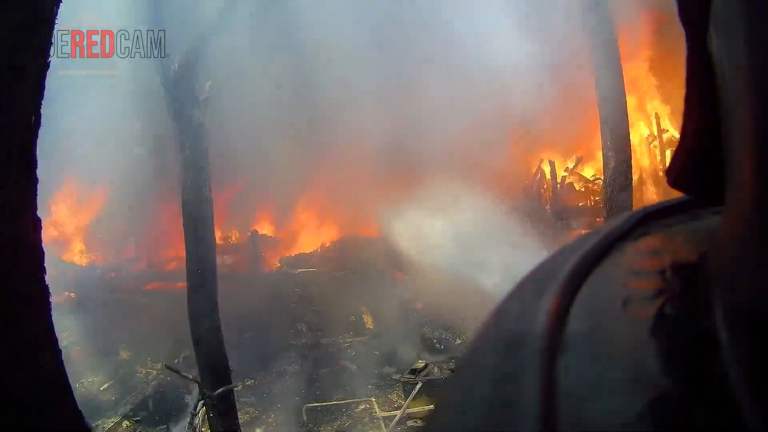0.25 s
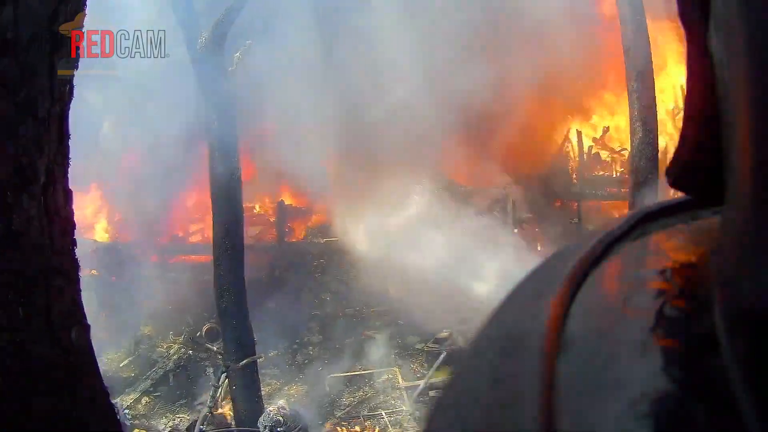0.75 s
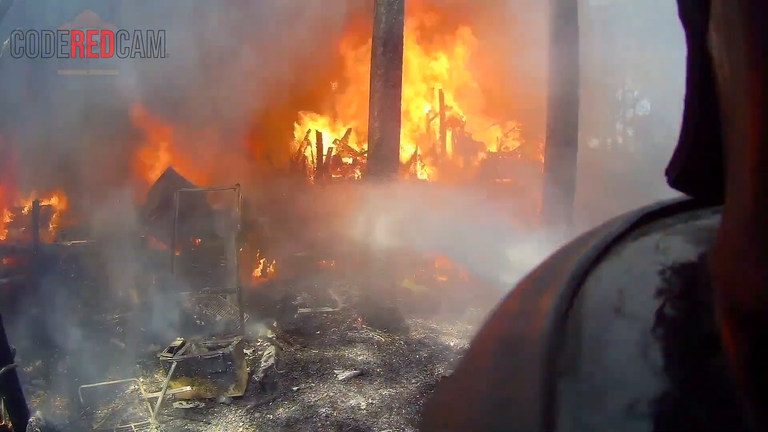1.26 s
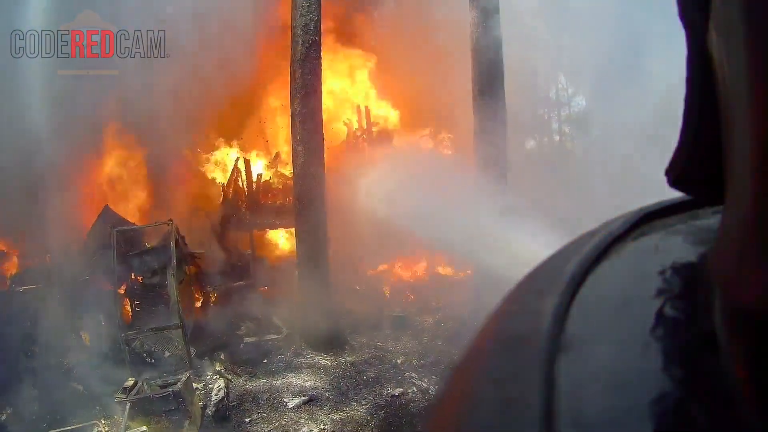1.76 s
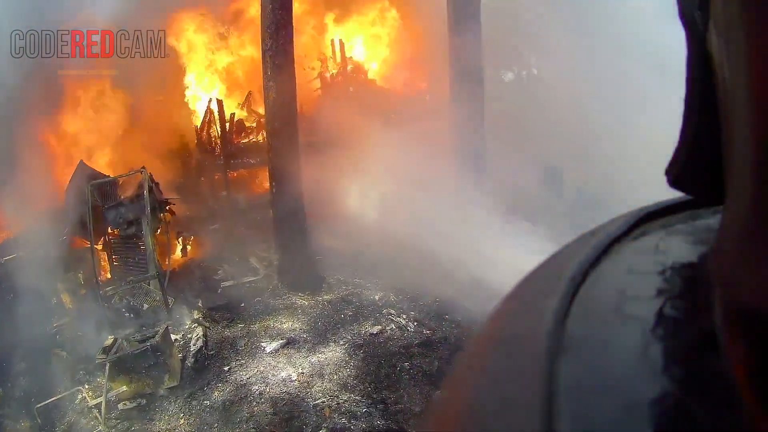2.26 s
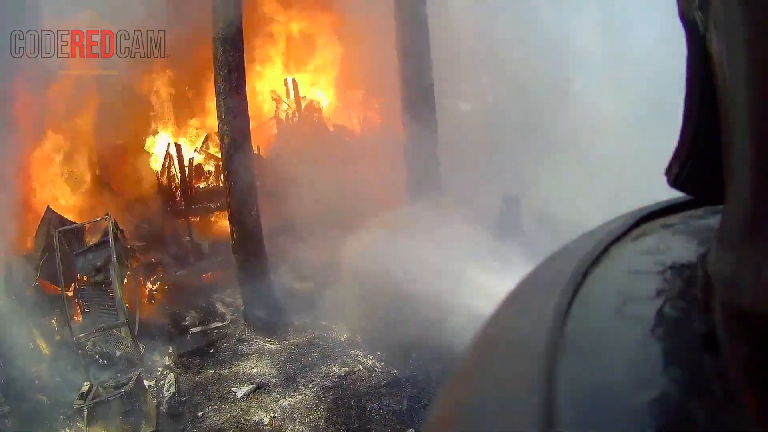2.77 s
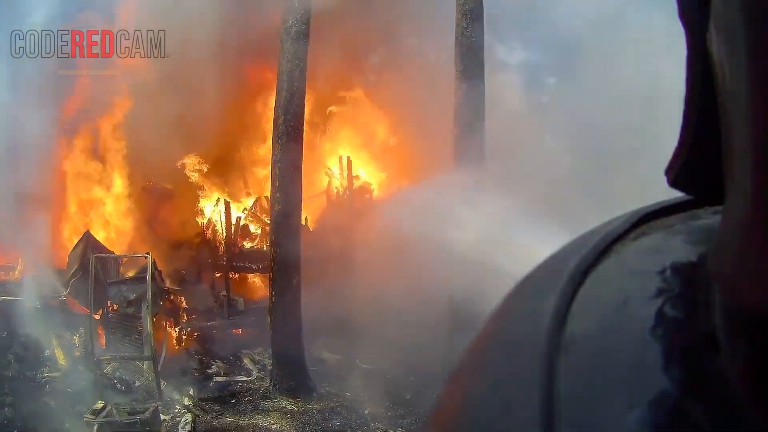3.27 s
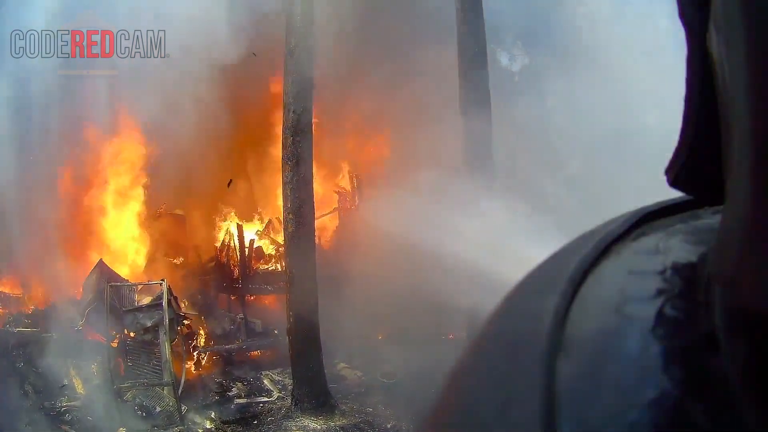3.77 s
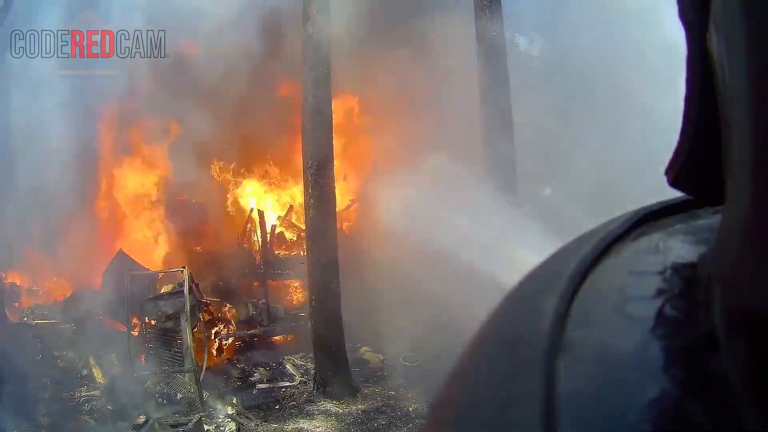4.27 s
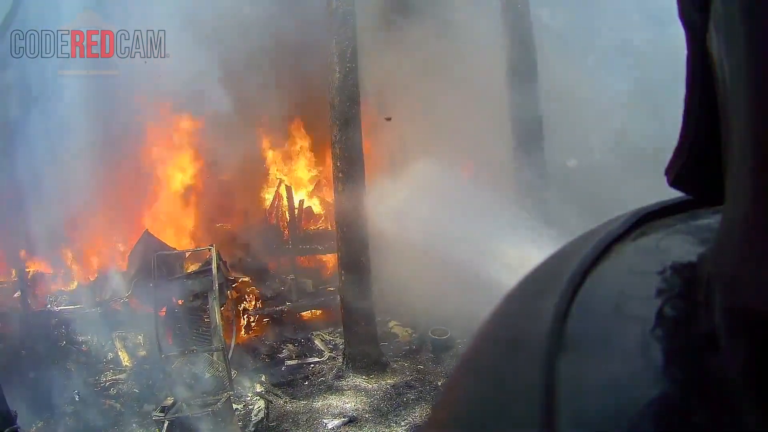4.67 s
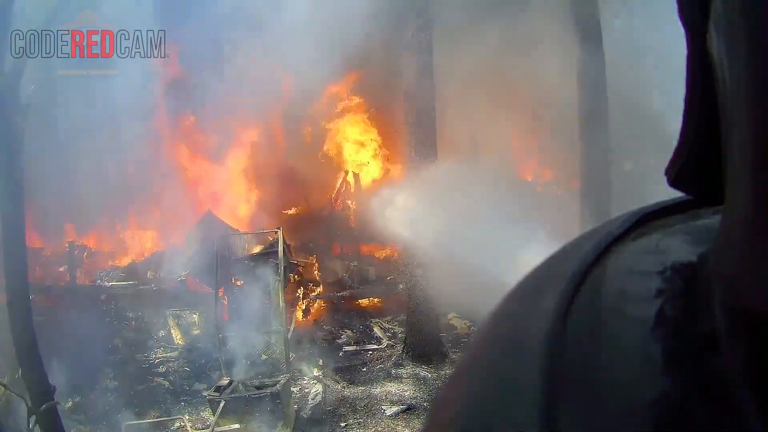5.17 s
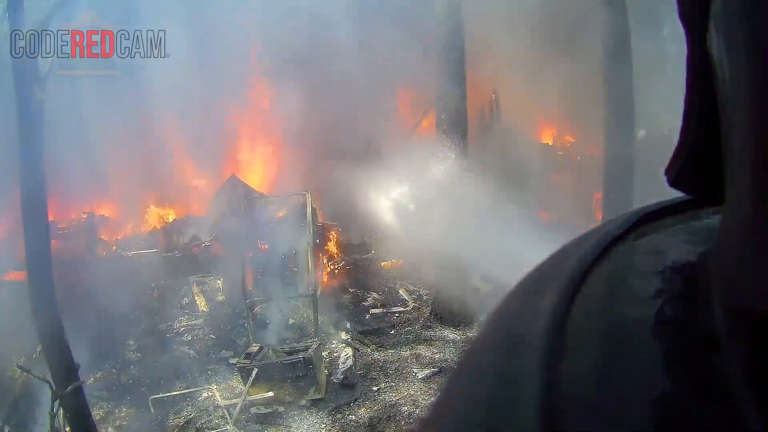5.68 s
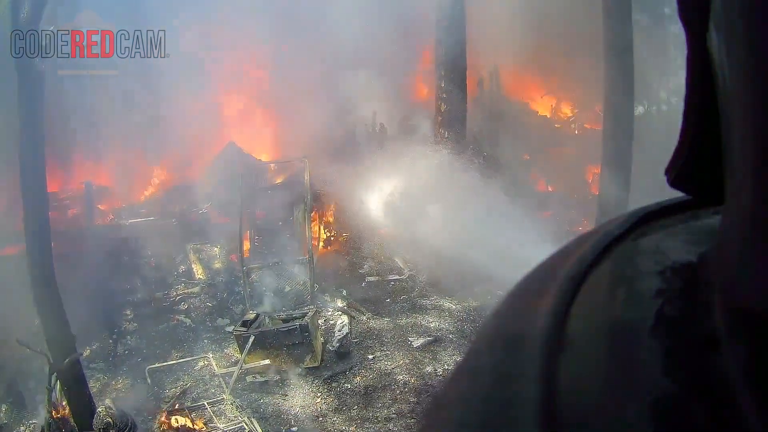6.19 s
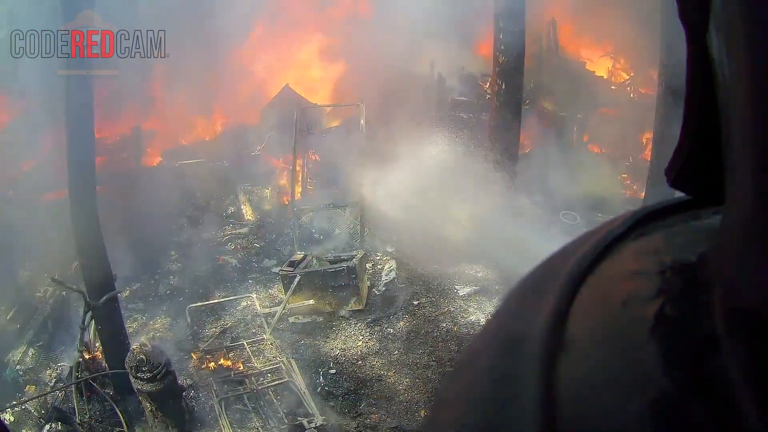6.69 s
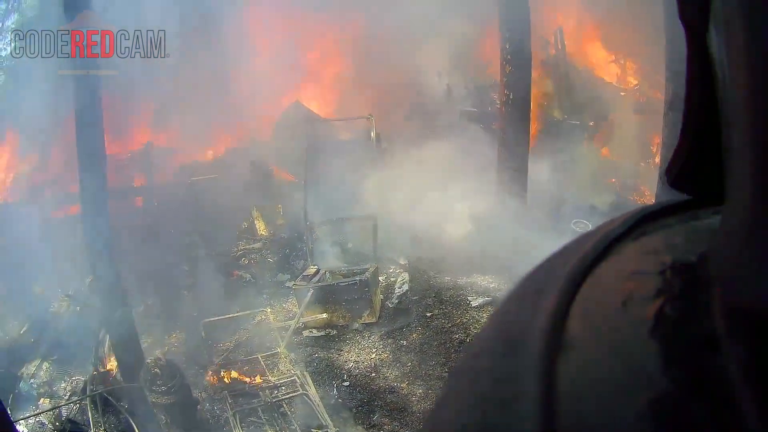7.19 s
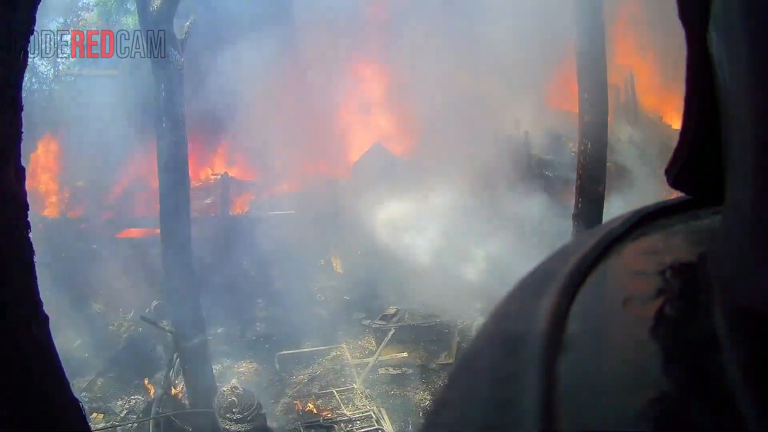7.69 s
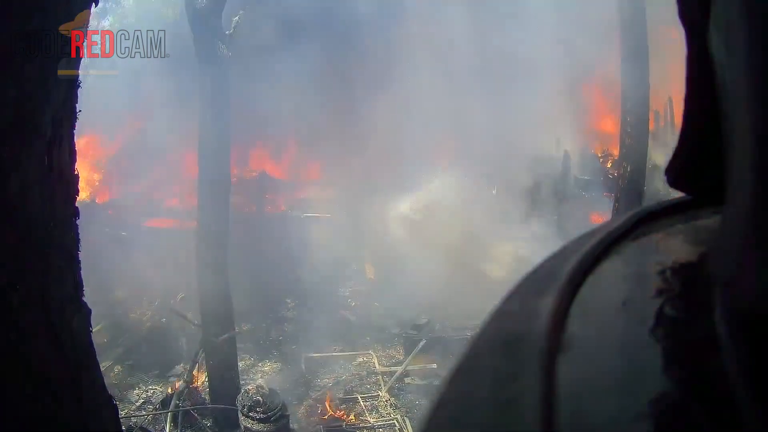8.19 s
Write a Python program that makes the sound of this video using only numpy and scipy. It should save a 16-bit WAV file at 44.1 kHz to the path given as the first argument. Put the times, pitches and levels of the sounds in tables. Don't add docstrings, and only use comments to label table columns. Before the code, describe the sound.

Boxy, continuous water spray swells and dips against trees while a brush fire rumbles, with dull helmet knocks, debris taps and tiny ember cracks.

```python
import sys
import numpy as np
from scipy import signal
from scipy.fft import rfft, irfft
from scipy.io import wavfile
from scipy.ndimage import uniform_filter1d

SR = 44100
rng = np.random.default_rng(int(sys.argv[2]) if len(sys.argv) > 2 else 0)


def nominal_scale(level):
    x = np.asarray(level, float) / 20
    return 10 ** x


def master_out(mix):
    frames = np.transpose(np.atleast_2d(mix))
    ceiling = np.clip(frames, -1, 1)
    pcm = np.round(ceiling * 32767).astype(np.int16)
    wavfile.write(sys.argv[1], SR, pcm)


N = 372204


def rms_one(x):
    return x / np.sqrt(np.mean(x ** 2) + 1e-20)


def in_time(rows):
    s, *columns = np.transpose(rows)
    return [np.interp(np.arange(N) / SR, s, c) for c in columns]


def gains(points, size):
    table_hz, table_db = np.transpose(points)
    hz = np.maximum(np.fft.rfftfreq(size, 1 / SR), 1)
    return hz, nominal_scale(np.interp(np.log(hz), np.log(table_hz), table_db))


def drift(rate):
    step = 40
    r = np.exp(-2 * np.pi * step * rate / SR)
    noise = rng.standard_normal(N // step + 2002)
    slow = signal.lfilter([1], [1, -2 * r, r * r], noise)[2000:]
    return np.interp(np.arange(N) / step, np.arange(len(slow)), rms_one(slow))


def in_bands(x, points, splits_hz, levels_db):
    hz, gain = gains(points, size=N)
    coloured = rfft(x) * gain
    above = [1] + [1 / (1 + (f / hz) ** 16) for f in splits_hz] + [0]
    out = 0
    for lower, upper, db in zip(above, above[1:], levels_db):
        band = irfft(coloured * (lower - upper), N)
        out = out + nominal_scale(db) * rms_one(band)
    return out


def part_levels(parts, controls, swells):
    squareness = 4
    first, second = in_time(controls)
    s, length, db, hz, reach = np.transpose(swells)[:, :, None]
    t = np.arange(0, N + 64, 64) / SR
    bells = db * np.exp(-np.abs(2 * (t - s) / length) ** squareness / 2)
    levels = []
    for part_hz, level_db, first_share, second_share in parts:
        octaves = np.log2(part_hz / hz)
        swell = np.sum(bells * np.exp(-(octaves / reach) ** 2 / 2), axis=0)
        swell = np.interp(np.arange(N) / SR, t, swell)
        levels.append(level_db + first_share * first + second_share * second + swell)
    return levels


# [f/Hz, level/dB per Hz]
HOUSING_LOW = [(500, -36), (780, -21), (1000, -6.5), (1350, 4), (1500, 3), (1900, -3.5), (2450, -9),
               (2700, -17.5), (2870, -29.5), (3100, -21), (3550, -16), (3760, -21.5), (4050, -37.5),
               (4360, -49.5)]
# [f/Hz, level/dB per Hz]
HOUSING_TOP = [(4640, -40), (4900, -46.5), (5340, -35), (5660, -38), (5910, -47.5), (6110, -43),
               (6810, -40), (7340, -35), (7660, -46), (8010, -55), (8510, -43), (9210, -49), (12210, -55),
               (14400, -85)]
JET_SPLITS = [1200, 1800, 2870, 4350, 7800]
# [t/s, nearness of landing level/dB, fineness of spray level/dB]
AIM = [(0.0, -1, -1), (0.6, -1, -3), (0.95, -0.5, -0.5), (1.6, 0, 1.5), (2.0, -1.5, -1.5), (2.25, 1, 1),
       (2.9, 0, -0.5), (3.3, 0.5, 0), (3.8, 0, 0), (3.95, -2, -1), (4.702, -2, -1.5), (5.0, 0.5, 1),
       (6.05, -0.5, 0.5), (6.2, 2, 2), (7.0, 1, 4.5), (7.8, 2.5, 2), (8.2, 2.5, 1), (8.44, -1.5, -1.5)]
# [centre f/Hz, level/dB, share of nearness, share of fineness]
JET_PARTS = [
    (1060, -46.5, 2.2, -0.16),
    (1480, -39.5, 1.18, -0.084),
    (2300, -48.5, 1.76, 0.53),
    (3500, -56, 1.04, 1.65),
    (6300, -70, 0.8, 1.23),
    (9000, -82, 0.8, 0.88),
]
# [t/s, length/s, swell level/dB, centre f/Hz, reach/octaves]
STRIKES = [(0.29, 0.26, 7, 5500, 0.89), (1.013, 0.2, 5, 3000, 1.9), (1.102, 0.074, 8, 2600, 1.5),
           (1.32, 0.019, 6, 3500, 0.36), (1.372, 0.15, 9.5, 3080, 0.76), (1.705, 0.047, 5, 3500, 0.66),
           (2.308, 0.24, 3.5, 5000, 0.48), (2.483, 0.22, 4, 2230, 0.22), (2.788, 0.089, 2, 6500, 0.6),
           (3.27, 0.13, 4.5, 1590, 0.62), (3.46, 0.1, 2, 2500, 1.3), (3.958, 0.065, 6.5, 6500, 0.78),
           (5.106, 0.093, 13, 2140, 0.51), (5.11, 0.12, 5, 6000, 0.47), (5.047, 0.04, 5.5, 3500, 0.3),
           (5.153, 0.028, 9.5, 3500, 0.32), (5.59, 0.065, 1, 2530, 0.5), (6.307, 0.089, 2.5, 4000, 0.73),
           (6.973, 0.061, 3.5, 6500, 0.44), (7.305, 0.13, 2.5, 2500, 0.71), (7.764, 0.096, 8, 4970, 0.52),
           (7.905, 0.062, 1, 1600, 0.6), (8.14, 0.18, 5.5, 5470, 0.6), (8.163, 0.085, 4.5, 1140, 0.6)]
# [t/s, length/s, dip level/dB, centre f/Hz, reach/octaves]
GAPS = [
    (0.114, 0.16, -7.5, 5000, 0.83),
    (1.22, 0.04, -1, 3200, 0.51),
    (1.284, 0.033, -4, 3500, 0.37),
    (2.65, 0.05, -1.5, 2500, 1.5),
    (5.304, 0.4, -3, 5000, 0.48),
    (6.09, 0.11, -4, 3500, 0.67),
    (6.457, 0.045, -2.5, 3000, 1.7),
    (6.586, 0.11, -8.5, 4200, 0.58),
    (7.46, 0.11, -4, 3200, 0.7),
    (7.998, 0.089, -3.5, 4500, 1.7),
]


def jet(drops_per_s=900, drop_db=-6.5, spread_db=6.5, flutter_db=0.7848, patch_db=0.26, fine_flutter=0.43):
    sizes = nominal_scale(spread_db * np.minimum(rng.exponential(1, N), 4)) * rng.choice([-1, 1], N)
    drops = sizes * (rng.random(N) < drops_per_s / SR)
    water = rng.standard_normal(N) + nominal_scale(drop_db) * drops
    flutter = flutter_db * drift(19.0)
    levels = []
    for part, db in zip(JET_PARTS, part_levels(JET_PARTS, AIM, STRIKES + GAPS)):
        shared = (1 + fine_flutter * part[3]) * flutter
        levels.append(db + shared + patch_db * drift(13.0))
    return in_bands(water, HOUSING_LOW + HOUSING_TOP, JET_SPLITS, levels)


# [f/Hz, level/dB per Hz]
LOW_AIR = [(15, -3), (30, 4), (50, 2.5), (75, 0.5), (110, -4.5), (165, -7.5), (300, -15), (480, -18.5),
           (620, -26), (800, -38), (1200, -52), (3000, -110)]
AIR_SPLITS = [60, 180, 400]
# [t/s, wind level/dB, vigour of flames level/dB]
WEATHER = [(0.0, -2, -3), (0.2, -2, 3.5), (0.75, -1.5, 2), (1.05, 10, 8), (1.4, 10.5, 0), (1.9, 7.5, -2),
           (2.4, -0.5, 4), (3.2, -1, -1.5), (3.6, 0.5, 0), (4.2, -3.5, -3.5), (4.7, 1, -3),
           (5.1, -0.5, -1.5), (5.7, 4.5, -1), (6.3, -9, 1), (6.7, 4, 5), (7.2, -1, 3), (7.8, -9.5, 5.5),
           (8.44, -1, -1)]
# [centre f/Hz, level/dB, share of wind, share of flames]
AIR_PARTS = [
    (35, -39, 0.35, 0.01),
    (100, -39, 0.44, 0.01),
    (270, -43.5, 0.071, 0.59),
    (520, -52.5, 0.01, 0.9),
]
# [t/s, length/s, swell level/dB, centre f/Hz, reach/octaves]
GUSTS = [(0.54, 0.1, 5, 35, 1.1), (0.717, 0.16, -11, 35, 0.99), (1.146, 0.056, 4.5, 80, 0.74),
         (1.306, 0.23, -4.5, 100, 1.1), (1.448, 0.048, 11, 90, 0.58), (1.463, 0.08, -2.5, 520, 0.8),
         (1.557, 0.18, 5, 35, 0.54), (1.65, 0.18, 4.5, 250, 1.3), (2.593, 0.088, -6.5, 100, 0.72),
         (2.86, 0.18, 3.5, 129, 0.53), (2.97, 0.045, 7, 35, 0.53), (3.184, 0.21, 5, 520, 0.73),
         (3.364, 0.11, 5, 55, 1.8), (4.894, 0.29, 3, 100, 0.52), (5.063, 0.084, 12.5, 45, 1.3),
         (5.215, 0.13, 3, 100, 0.6), (5.4, 0.18, 9, 120, 1.1), (5.548, 0.095, -1, 100, 0.6),
         (5.977, 0.078, 3, 40, 0.9), (6.7, 0.15, -1, 35, 1), (7.365, 0.15, 9.5, 60, 1.25),
         (7.867, 0.07, 4.5, 520, 0.29), (7.95, 0.2, 3, 35, 0.53), (8.163, 0.1, 9.5, 520, 0.3)]


def air(lump_db=-0.85, trim_db=-0.5, own_db=0.9):
    lumps = lump_db * drift(6.6) + trim_db
    levels = [db + lumps + own_db * drift(7.4) for db in part_levels(AIR_PARTS, WEATHER, GUSTS)]
    return in_bands(rng.standard_normal(N), LOW_AIR, AIR_SPLITS, levels)


# [f/Hz, width f/Hz, rms level/dB]
ENGINE = [(71.2, 1.5, -46.5), (121, 2, -44), (138.45, 1.02, -42.5), (227.3, 2, -51.5), (286.6, 0.44, -54)]


def engine():
    out = 0
    for hz, width_hz, db in ENGINE:
        r = np.exp(-np.pi * width_hz / SR)
        resonance = [1, -2 * r * np.cos(2 * np.pi * hz / SR), r * r]
        line = signal.lfilter([1, 0, -1], resonance, rng.standard_normal(N + SR))[SR:]
        power = uniform_filter1d(line ** 2, size=SR // 4) + 0.9 * np.mean(line ** 2)
        out = out + nominal_scale(db) * rms_one(line / np.sqrt(power))
    return out


# [f/Hz, level/dB per Hz]
PREAMP = [(300, -2), (4000, -2), (9000, -2), (12400, -1.5), (13300, -3), (14200, -12), (16000, -24)]


def preamp_hiss(level_db=-72.5):
    spectrum = rfft(rng.standard_normal(N)) * gains(PREAMP, size=N)[1]
    return nominal_scale(level_db) * rms_one(irfft(spectrum, N))


# [t/s, peak level/dB, f/Hz, cycles to die]
THUMPS = [(0.539, -21, 40, 2.6), (0.935, -16.5, 59.6, 3.4), (1.053, -20, 61.5, 4),
          (1.112, -16.5, 40.4, 4.3), (1.129, -14.5, 72.7, 5), (1.199, -13, 86.1, 3.2),
          (1.435, -16, 77.6, 7), (1.524, -24, 47.6, 5.7), (1.659, -18.5, 67.3, 5.6), (1.838, -20, 92, 4.8),
          (1.915, -19, 80, 4.5), (2.837, -14.5, 68, 2.2), (2.948, -20, 75.4, 3.9),
          (3.003, -24.5, 40.4, 3.6), (3.307, -25.5, 128, 6), (3.337, -18, 116, 4.3),
          (4.863, -24.5, 98, 8.7), (4.895, -16, 45.8, 2.6), (5.034, -20, 43.6, 3.9),
          (5.079, -18, 40.4, 4.5), (5.398, -13.5, 111, 4.8), (5.425, -15.5, 45.8, 5.2),
          (5.526, -16.5, 105, 4.5), (7.311, -21, 59, 5.2), (7.39, -33, 127, 4.5), (7.985, -19.5, 118, 6)]
# [t/s, peak level/dB, f/Hz, cycles to die]
TAPS = [
    (2.328, -16, 1320, 12),
    (2.957, -19, 600, 5.2),
    (3.991, -18.5, 1440, 36),
    (5.395, -13, 258, 5.8),
    (5.507, -23, 1480, 30),
    (7.841, -26.5, 490, 25),
    (7.885, -22.5, 520, 22),
    (8.1, -29, 730, 17),
    (8.13, -28, 576, 27),
]


def knocks(trim_db=-4.5, thump_lift_db=13):
    out, t = np.zeros(N + SR), np.arange(SR // 4) / SR
    thumps = [(s, db + thump_lift_db, hz, cycles) for s, db, hz, cycles in THUMPS]
    for s, db, hz, cycles in thumps + TAPS:
        at = round(s * SR)
        decay = nominal_scale(db + trim_db - 60 * t * hz / cycles)
        soft_contact = (1 - np.exp(-3 * hz * t)) ** 2
        out[at:at + len(t)] -= decay * np.sin(2 * np.pi * hz * t) * soft_contact
    return out[:N]


def housing_response():
    cepstrum = irfft(np.log(gains(HOUSING_LOW + HOUSING_TOP, size=4096)[1]))
    cepstrum[1:2048] *= 2
    cepstrum[2049:] = 0
    return irfft(np.exp(rfft(cepstrum)))[:1024]


# [t/s, peak level/dB, low part level/dB]
CRACKS = [
    (1.7094, -60, 26),
    (1.9505, -49, 0),
    (2.0043, -53, 3),
    (2.6569, -52, 3),
    (2.759, -50, -3),
    (2.7895, -43, -8),
    (3.4496, -49, 3),
    (3.923, -48, 3),
    (4.0512, -49, 18),
    (4.21, -62, 18),
]


def cracks(burst_s=.0012):
    response, out = housing_response(), np.zeros(N + SR)
    top = signal.sosfilt(signal.butter(6, 4400, "high", fs=SR, output="sos"), response)
    dull = signal.sosfilt(signal.butter(3, 2400, "high", fs=SR, output="sos"), response - top)
    burst = rng.standard_normal((len(CRACKS), 256)) * np.exp(-np.arange(256) / SR / burst_s)
    for (s, db, low_db), shape in zip(CRACKS, burst):
        bright = np.convolve(shape, top)
        sound = bright + nominal_scale(low_db - 19.0) * np.convolve(shape, dull)
        at = round(s * SR)
        out[at:at + len(sound)] += nominal_scale(db) * sound / np.abs(bright).max()
    return out[:N]


def scene():
    return (jet() + air() + engine() + knocks() + cracks())[None]


def roll_off(x):
    return signal.sosfilt(signal.butter(12, 14290, fs=SR, output="sos"), x)


def record(dry):
    rounded = 0.31 * np.tanh(dry / 0.34)
    mix = rounded + preamp_hiss()
    return roll_off(mix)


dry = scene()
out = record(dry)
master_out(out)
```